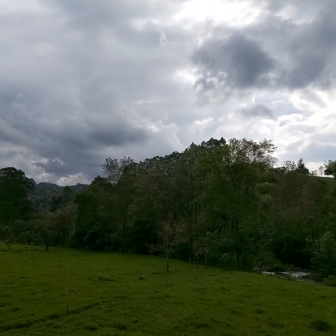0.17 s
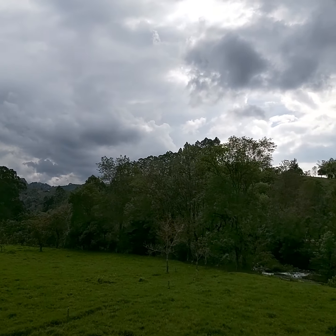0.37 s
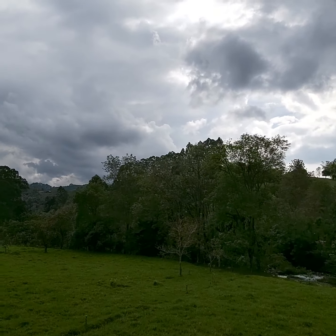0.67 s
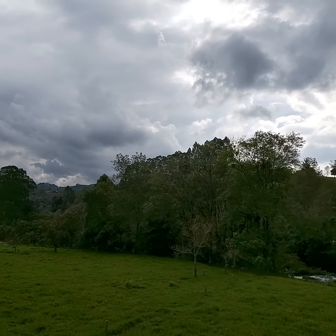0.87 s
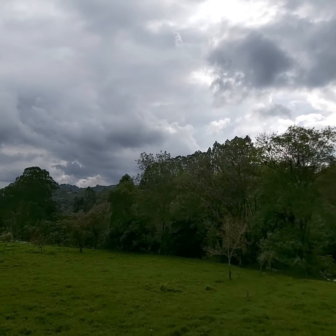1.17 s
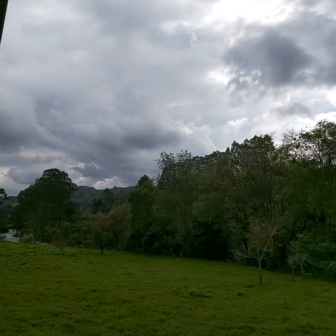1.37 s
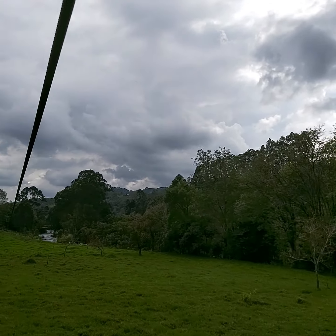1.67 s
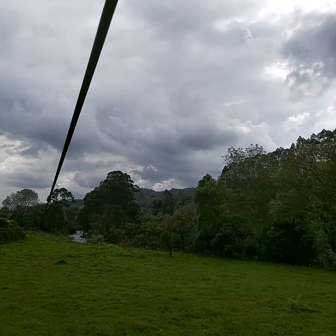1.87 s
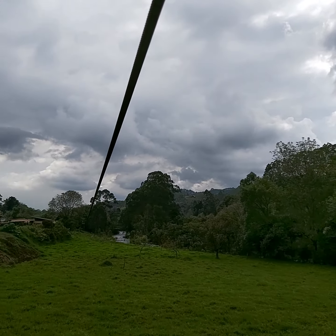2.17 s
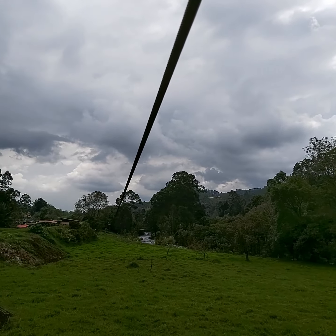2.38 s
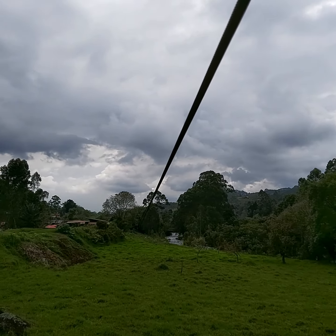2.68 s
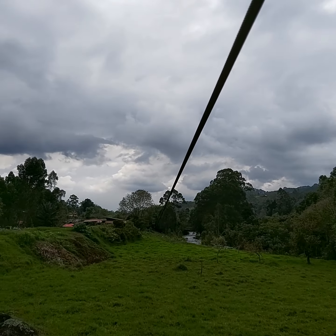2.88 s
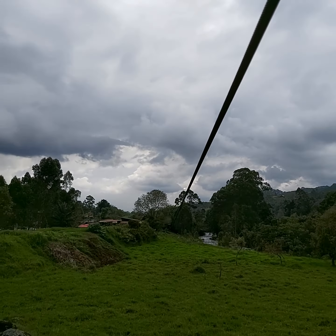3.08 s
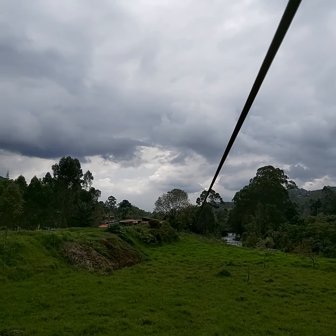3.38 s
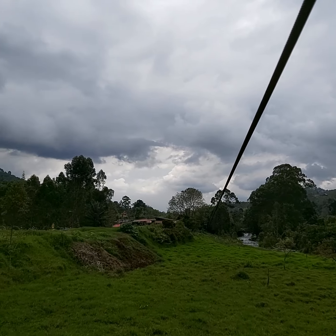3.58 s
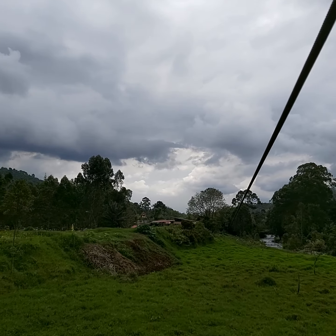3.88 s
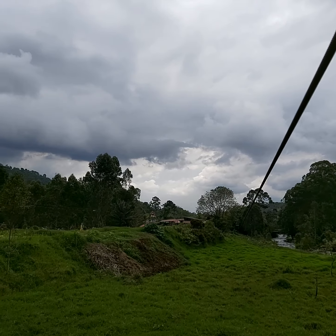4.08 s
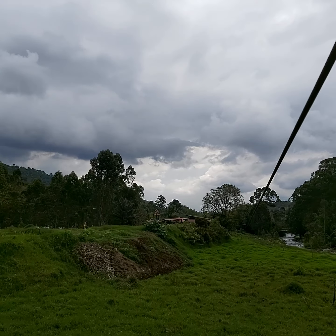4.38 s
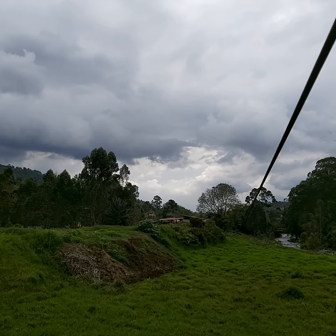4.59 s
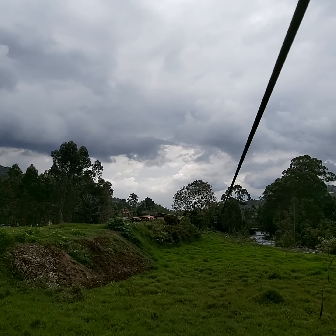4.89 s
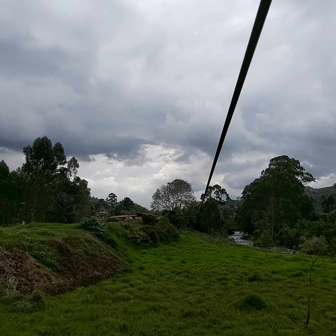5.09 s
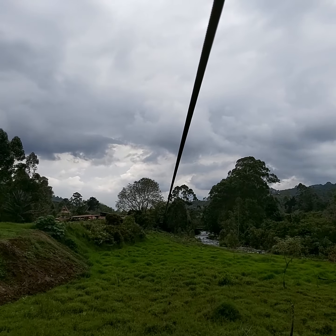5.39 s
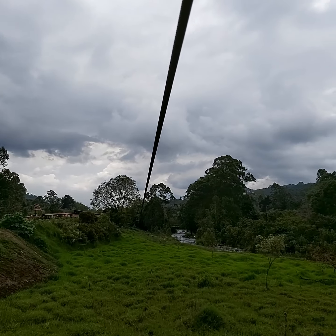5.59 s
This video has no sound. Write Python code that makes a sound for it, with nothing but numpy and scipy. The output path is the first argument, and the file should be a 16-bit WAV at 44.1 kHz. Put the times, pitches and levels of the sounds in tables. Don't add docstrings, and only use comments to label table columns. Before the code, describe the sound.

A zipline trolley hisses and sings steadily on a steel cable close overhead while wind rumbles and puffs against a hand-held phone outdoors.

```python
import sys
import numpy as np
from scipy import signal
from scipy.fft import rfft, irfft, next_fast_len
from scipy.io import wavfile
from scipy.ndimage import uniform_filter1d, map_coordinates

SR = 44100
rng = np.random.default_rng(int(sys.argv[2]) if len(sys.argv) > 2 else 0)


def attenuation_scalar(level_db):
    decades = np.asarray(level_db, float) / 20
    return 10 ** decades


def dump_mix(stems):
    frames = np.atleast_2d(stems).T
    limited = np.clip(frames, -1, 1)
    pcm = np.round(limited * 32767).astype(np.int16)
    wavfile.write(sys.argv[1], SR, pcm)


N = 252693

# time_s, left_ear_late_us, wheel_load_db
TROLLEY = [(0, -44, 0.5), (.3, -57, 0.2), (.6, -66, 0.5), (.8, -25, 1.5), (1.2, 41, -0.5), (1.6, 98, 1.3),
           (1.95, 127, -0.5), (2.2, 101, 0), (2.7, 147, 0.1), (3.2, 140, 1), (3.7, 137, 0.9), (4, 147, 2.2),
           (4.25, 148, 0.6), (4.6, 132, 1.8), (4.8, 107, 1.8), (5.2, 55, 0), (5.45, 50, -0.35),
           (5.73, 42, 0.2)]
# time_s, turns_per_s (two twists of the cable pass per turn)
WHEEL = [(0, 44.41), (0.5, 45.06), (1, 45.72), (1.5, 46.38), (2, 47.02), (2.5, 47.62), (3, 48.15),
         (3.5, 48.6), (4, 48.97), (4.5, 49.25), (5, 49.47), (5.73, 49.78)]
# group, pitch_hz, width_hz, level_db, gain_when_turned_db, gain_at_full_speed_db
PLATES = [(0.0, 1730.0, 420.0, -18.9, 1.6, 15.7), (0.0, 1550.0, 370.0, 9.2, -6.6, -13.3),
          (0.0, 2520.0, 720.0, 7.2, -4.6, -8.8), (0.0, 2910.0, 520.0, 3.9, -1.7, -6.6),
          (0.0, 3260.0, 380.0, -23.4, 5.3, 11.0), (1.0, 4000.0, 420.0, 1.9, -2.1, 7.7),
          (1.0, 5200.0, 760.0, -16.8, 9.3, 8.5), (1.0, 4840.0, 920.0, 1.9, -2.0, -20.0),
          (1.0, 5870.0, 730.0, -6.0, -4.1, 7.8), (2.0, 7280.0, 790.0, -2.3, -0.9, -0.5),
          (2.0, 7940.0, 650.0, -2.7, 0.9, 1.5), (3.0, 9550.0, 1370.0, -5.1, -0.4, 7.0),
          (3.0, 10280.0, 450.0, -0.2, -0.9, 3.4), (3.0, 11510.0, 960.0, -0.1, -0.3, -2.9),
          (3.0, 12330.0, 930.0, -5.1, 0.9, -0.6), (3.0, 14780.0, 1310.0, -4.4, -1.3, -7.0)]
# level_db, gain_when_turned_db, loss_with_turn_squared_db, gain_at_full_speed_db
GROUPS = [
    (-22, -2.5, 1.06, 1.5),
    (-20.5, -0.73, 0.84, 4),
    (-22.5, 2.5, 6.5, -1.47),
    (-27, 1.55, 5.5, -0.1),
]
FACES = (-1, 1, -1, -1)
# multiple_of_twist_rate, level_db
WIRES = [(13, -53), (14, -52), (15, -53), (16, -47), (19, -46), (20, -46), (23, -50), (24, -47), (26, -45),
         (28, -46), (29, -49)]
# multiple_of_twist_rate, start_s, length_s, level_db
SPELLS = [
    (27, 0, .5, -43),
    (17, .4, 1.13, -28.5),
    (20, 1.9, .4, -35),
    (18, 2.8, 1.05, -35),
    (27, 3.3, .8, -37),
    (17, 4.2, 1.45, -33.5),
    (18, 4.4, .5, -34),
]
SPELL_FADE_S, FAINT_DB = .12, -48
# time_s, peak_db
TICKS = [
    (1.889, -17),
    (3.2026, -19),
]
# pitch_hz, share_alike_in_both_ears, left_minus_right_db, left_lead_rad
PORTS = [(1310, 0.69, -2.5, -1.87), (1930, 0.7, -3.5, -0.71), (2920, 0.93, -3, -0.69),
         (3060, 0.84, -4, 0.15), (4250, 0.87, 0, 0.24), (5280, 0.64, -3, -0.85), (5780, 0.84, -2, 0.83),
         (6500, 0.87, 0, -0.57), (7840, 0.85, -4.5, 0.72), (9000, 0.85, -4.5, 0.18),
         (10900, 0.8, -4, -0.91), (11700, 0.72, -3.5, -0.51), (13700, 0.47, -8, -0.31),
         (15500, 0.35, -1, 0)]

# pitch_hz, level_db
WHISTLE_S, WHISTLE_DB = (.05, .28), -25
WHISTLE = [(1600, -40), (1750, -6), (1820, 0), (1890, -6), (2050, -40)]
# time_s, level_db
HOWL = [(.02, -31), (.053, -22.5), (.098, -18), (.118, -21), (.145, -31), (.163, -28), (.189, -25),
        (.217, -19), (.25, -18), (0.272, -17), (.298, -23)]
HOWL_BEAT_S, HOWL_HZ, HOWL_BED_DB = 0.0064, 386, -28

# time_s, level_db
WIND = [(0, -36), (.1, -28.5), (.29, -26), (.35, -33), (.5, -28), (.8, -35), (1.1, -34), (1.3, -31),
        (1.5, -30), (1.7, -28), (1.85, -39.5), (2.7, -34.5), (3.3, -41), (3.5, -45), (3.9, -32.5),
        (4.3, -30), (4.8, -32.5), (5.73, -44)]
# pitch_hz, level_db
RUMBLE = [(15, -42), (40, -11.5), (95, -1), (170, -10.5), (350, -27.5), (700, -23)]
# pitch_hz, level_db
RUSH_LEFT = [(100, -7.5), (250, -1), (600, -6), (900, -6), (1200, 3.5), (1800, -16)]
RUSH_RIGHT = [(30, -53), (130, -18.5), (230, -26), (310, 2.5), (600, 0.5), (900, 2), (1400, 1.5),
              (2500, -57)]
LEFT_RUSH_DB, LEFT_FOLLOWS, LEFT_TURNED_DB = -39.5, 0.17, 2.5
RIGHT_RUSH_DB, RIGHT_FOLLOWS, RIGHT_SHELTER_DB = -30.5, 0.24, -7

# centre_s, thump_db, thump_pitch_hz, flutter_above_thump_db
PUFFS = [(0.368, -33, 180, -5), (0.49, -38, 260, 0), (0.965, -39, 240, 12), (1.488, -35, 280, 6),
         (1.535, -34, 210, 1), (1.64, -31, 190, 3), (1.67, -35.5, 180, 9), (2.245, -37, 332, 13),
         (2.991, -42, 180, 15), (3.404, -36, 330, 5), (3.557, -33, 233, -5), (3.603, -35, 210, 12),
         (3.77, -37, 250, 9), (3.816, -29.5, 220, 3), (3.835, -35, 310, 5), (3.878, -19.5, 270, -8),
         (3.916, -28, 250, 2), (4.047, -26.5, 129, -14), (4.102, -23.5, 241, -11), (4.173, -18.5, 240, -25),
         (4.23, -27.5, 210, -14), (4.294, -20, 163, -8), (4.36, -20, 248, -12), (4.415, -23, 320, -20),
         (4.482, -29, 270, -17), (4.529, -25.5, 240, -13), (4.663, -26, 197, -24), (4.7, -32, 270, 5),
         (4.753, -22, 240, -13), (5.663, -27, 129, -6)]
# pitch_hz, level_db
THUMP = [(25, -47), (80, 3), (150, -17.5), (330, -1), (550, -4.5), (900, -19.5)]
FLUTTER = [(300, -23), (550, -4), (800, 6), (1150, -1), (1600, -2), (3000, -40)]
# time_s, left_minus_right_db
PUFF_LEAN = [
    (3.75, 14),
    (3.85, 2.5),
    (5, 3),
    (5.5, 8),
]
PUFF_CYCLES, FLUTTER_S, PUFF_NOISE, WAKE_S = .9, .007, .65, .013
SQUALL_S, SQUALL_PER_S, SMALL_DB, SMALL_HZ = (3.1, 4.85), 34, -42, 190
# start_s, end_s, level_db
FLURRIES = [
    (3.55, 3.63, -35.5),
    (3.8, 3.93, -35),
    (2.3, 2.6, -39.5),
    (3.05, 3.5, -41.5),
]
# pitch_hz, level_db
BAND = [(15720, 0), (15800, -120)]


def unit(x):
    return x / np.sqrt(np.mean(np.abs(x) ** 2) + 1e-20)


def along(points, hz):
    f, v = np.transpose(points)
    return np.interp(np.log(hz + 1), np.log(f + 1), v)


def curves(rows, t=None):
    s, *cols = np.transpose(rows)
    if t is None:
        t = np.arange(N) / SR
    return [np.interp(t, s, c) for c in cols]


def wobble(rate):
    knots = rng.standard_normal(int(N * rate / SR) + 4)
    return map_coordinates(knots, [np.arange(N) * rate / SR])


def span(start, end, fade):
    t = np.arange(N) / SR
    return np.clip(np.minimum(t - start, end - t) / fade + 1, 0, 1) ** 2


def coloured(x, spectrum):
    m = next_fast_len(N + 8192)
    gain = attenuation_scalar(along(spectrum, np.fft.rfftfreq(m, 1 / SR)))
    return irfft(rfft(x, m) * gain, m)[..., :N]


def noise(spectrum):
    return unit(coloured(rng.standard_normal(N), spectrum))


def resonance(f, hz, width):
    return 1j * f * width / (hz * hz - f * f + 1j * f * width)


def motion(t=None):
    away = curves(TROLLEY, t)[0] / 150
    speed = (curves(WHEEL, t)[0] - 44.4) / 5.3
    return away, speed


def contact(turns):
    bumps = rng.standard_normal((3, N))
    load_db = .7 * np.cos(4 * np.pi * turns + 1.5 * wobble(6))
    load_db = load_db + .15 * wobble(12) + .2 * wobble(40) + 1.1 * wobble(300)
    front = bumps * attenuation_scalar(load_db)
    delay_s = .392 / curves(WHEEL)[0] * (1 + .0025 * wobble(5))
    behind = np.arange(N) - delay_s * SR
    rear = np.array([map_coordinates(row, [behind], order=3, mode="wrap") for row in front])
    return front + .3 * rear


def singing(turns):
    faint = [(k, FAINT_DB) for k in (17, 18, 27)]
    levels = {round(k): attenuation_scalar(db + 2.4 * wobble(2.09)) for k, db in [*WIRES, *faint]}
    for k, start, length, db in SPELLS:
        swell = span(start, start + length, SPELL_FADE_S) * attenuation_scalar(db + 0.55 * wobble(3.9))
        levels[round(k)] = levels[round(k)] + swell
    out = np.zeros(N)
    for k, gain in levels.items():
        phase = 4 * np.pi * k * turns + 0.49 * wobble(9) + 9 * rng.random()
        out += np.sqrt(2) * gain * np.sin(phase)
    return out


def wire_ends():
    ticks = np.zeros(N)
    t = np.arange(300) / SR
    for s, db in TICKS:
        ticks[round(s * SR):][:300] = attenuation_scalar(db + 27.5 - 60 * t / 0.0061) * rng.standard_normal(300)
    return ticks


def plates(f, t):
    load_db = curves(TROLLEY, t)[1]
    away, speed = motion(t)
    whole, blurred = 0, 0
    for group, (db, turn_db, bend_db, speed_db) in enumerate(GROUPS):
        group_db = load_db + db + turn_db * away - bend_db * away ** 2 + speed_db * speed
        modes = []
        for k, (g, hz, width, level, mode_turn_db, mode_speed_db) in enumerate(PLATES):
            if g == group:
                gain = attenuation_scalar(level + mode_turn_db * away + mode_speed_db * speed)
                modes.append((-1) ** k * gain * resonance(f, hz, width))
        modes = np.array(modes)
        modes = modes * attenuation_scalar(group_db) / np.sqrt(np.mean(np.abs(modes.sum(0)) ** 2, axis=0))
        whole = whole + FACES[group] * modes.sum(0)
        blurred = blurred + (np.abs(modes) ** 2).sum(0)
    patches = uniform_filter1d(rng.standard_normal(whole.shape), 22, 0)
    patches = unit(uniform_filter1d(patches, 3, 1))
    tremble = unit(uniform_filter1d(rng.standard_normal(len(t)), size=3))
    uneven_db = patches * (.3 + .9 * f / 12000) + .3 * tremble * np.clip(f / 9000, 0, 1) ** 2
    small = 1 / (1 + (1350 / (f + 1)) ** 6)
    gain = small * attenuation_scalar(uneven_db)
    return whole * gain, np.sqrt(blurred) * gain


def trolley():
    turns = np.cumsum(curves(WHEEL)[0]) / SR
    f, t, z = signal.stft(unit(contact(turns)) + wire_ends(), SR, nperseg=1024)
    f = f[:, None]
    whole, blurred = plates(f, t)
    hz, *columns = np.transpose(PORTS)
    alike, lean_db, lead = [np.interp(f, hz, c) for c in columns]
    alike = np.clip(alike, 0, 1)
    late = curves(TROLLEY, t)[0] * 1e-6
    shaded = np.clip(-late / 5e-5, 0, 1) * np.exp(-((f - 3700) / 800) ** 2)
    lead = lead - 2 * np.pi * f * late - 0.96 * shaded
    whistle = attenuation_scalar(WHISTLE_DB) * span(*WHISTLE_S, 0.027) * noise(WHISTLE)
    tones = signal.stft(singing(turns) + whistle, nperseg=1024)[2]
    direct = np.sqrt(alike) * whole * z[0] + tones
    ears = []
    for side, stray in zip((.5, -.5), z[1:]):
        scattered = np.sqrt(1 - alike) * blurred * stray
        ears.append(attenuation_scalar(side * lean_db) * (direct * np.exp(1j * side * lead) + scattered))
    return signal.istft(np.array(ears), nperseg=1024)[1][:, :N]


def howl():
    t = np.arange(N) / SR
    beats = sum(attenuation_scalar(db) * np.exp(-((t - s) / HOWL_BEAT_S) ** 2) for s, db in HOWL)
    hum = np.sqrt(2) * np.sin(np.cumsum(2 * np.pi * HOWL_HZ / SR * (1 + .2 * wobble(60))))
    breath = noise([(150, -33), (280, -10), (390, 0), (520, -7.0), (1000, -32.0)])
    bed = attenuation_scalar(HOWL_BED_DB) * span(0.034, .29, .02) * breath
    return beats * (0.55 * hum + 0.48 * breath) + bed


def lumps(slow_db, fast_db, fast_rate):
    return unit(attenuation_scalar(slow_db * wobble(14) + fast_db * wobble(fast_rate)))


def wind():
    rumble_db, = curves(WIND)
    swing_db = rumble_db - rumble_db.mean()
    away, speed = motion()
    left_db = LEFT_RUSH_DB + LEFT_FOLLOWS * swing_db + LEFT_TURNED_DB * away
    right_db = RIGHT_RUSH_DB + RIGHT_FOLLOWS * swing_db + RIGHT_SHELTER_DB * speed ** 1.46
    rumble = attenuation_scalar(rumble_db) * lumps(1.96, 1.11 * 1.96, 45) * noise(RUMBLE)
    left_rush = attenuation_scalar(left_db) * lumps(1.5, 3, 50) * noise(RUSH_LEFT)
    right_rush = attenuation_scalar(right_db) * lumps(1.0, 1.11, 45) * noise(RUSH_RIGHT)
    return np.array([rumble + left_rush, right_rush + howl()])


def port_pair(spectrum):
    own = np.array([noise(spectrum), noise(spectrum)])
    pair = unit(0.53 * noise(spectrum) + 1.9 * own)
    return np.pad(pair, ((0, 0), (1000, 1000)))


def small_eddies():
    start, end = SQUALL_S
    luck = rng.random((round((end - start) * SQUALL_PER_S), 4)).T
    return np.transpose([start + (end - start) * luck[0], SMALL_DB + 10 * luck[1] ** 2,
                         SMALL_HZ * 2 ** (2 * luck[2] - 1), -16 + 14 * luck[3]])


def puffs():
    rumble, flutter = port_pair(THUMP), port_pair(FLUTTER)
    out = np.zeros((2, N + 2000))
    t = np.arange(-1000, 1000) / SR
    for s, db, hz, flutter_db in [*PUFFS, *small_eddies()]:
        here = slice(round(s * SR), round(s * SR) + len(t))
        pan_db, = curves(PUFF_LEAN, s)
        phase = rng.random() + .5 * rng.random((2, 1))
        swing = np.sqrt(2) * np.sin(2 * np.pi * (hz * t + phase))
        wake = PUFF_NOISE * rumble[:, here] * np.exp(-((t - WAKE_S / 3) / WAKE_S) ** 2)
        thump = swing * np.exp(-(t * hz / PUFF_CYCLES) ** 2) + wake
        thump = attenuation_scalar([[pan_db / 2], [-pan_db / 2]]) * thump
        light = attenuation_scalar(flutter_db + 1.5) * flutter[:, here] * np.exp(-(t / FLUTTER_S) ** 2)
        out[:, here] += attenuation_scalar(db - 2.7) * (thump + light)
    flurry = sum(attenuation_scalar(db) * span(start, end, 0.013) for start, end, db in FLURRIES)
    flurry = flurry * attenuation_scalar(4.9 * wobble(60))
    return out[:, 1000:N + 1000] + flurry * flutter[:, :N]


def scene():
    return trolley() + wind() + puffs()


def band_limit(x):
    return signal.sosfilt(signal.butter(12, 16150, fs=SR, output="sos"), x)


def record(dry):
    heard = coloured(dry, BAND)
    return band_limit(heard)


dry = scene()
out = record(dry)
dump_mix(out)
```